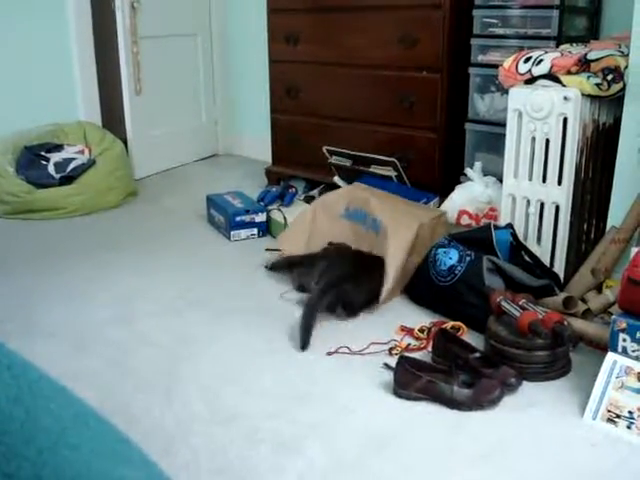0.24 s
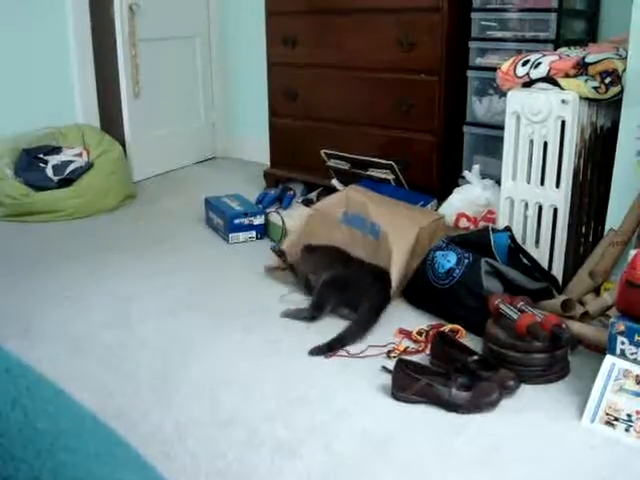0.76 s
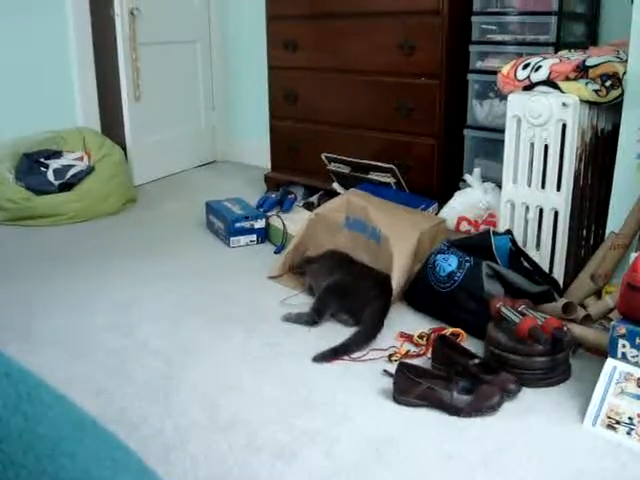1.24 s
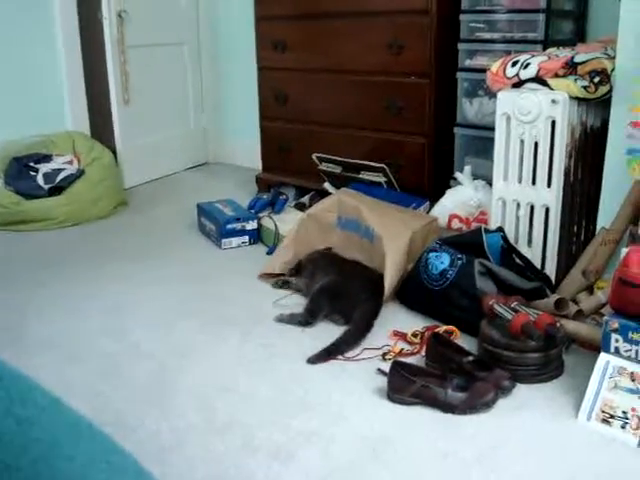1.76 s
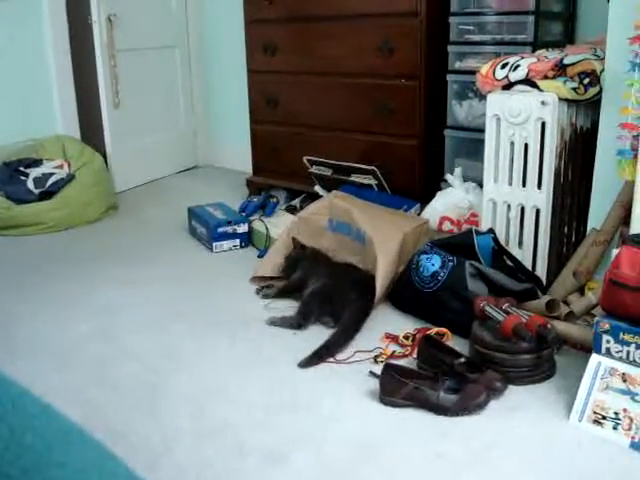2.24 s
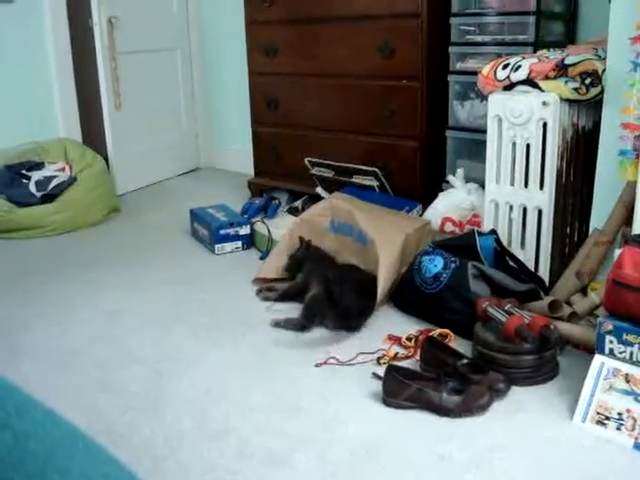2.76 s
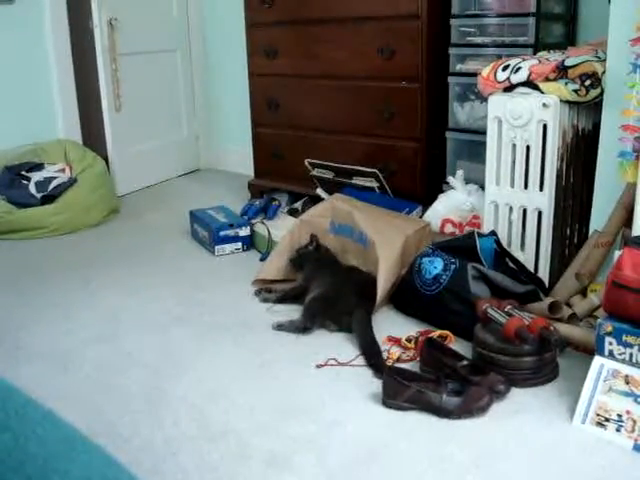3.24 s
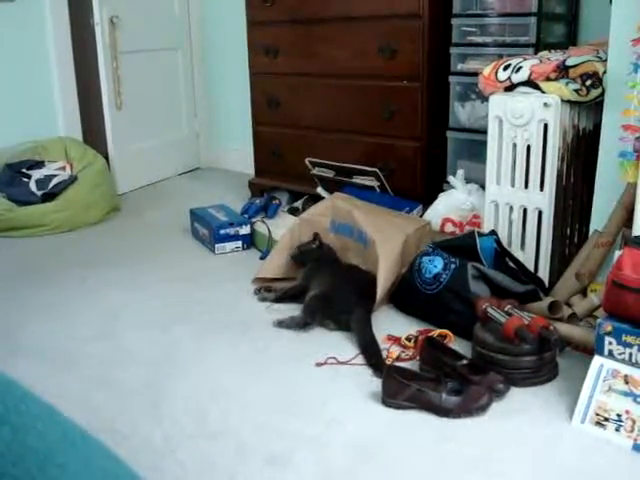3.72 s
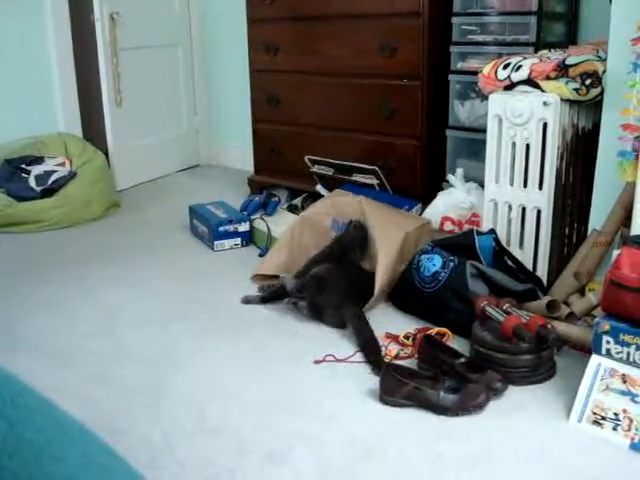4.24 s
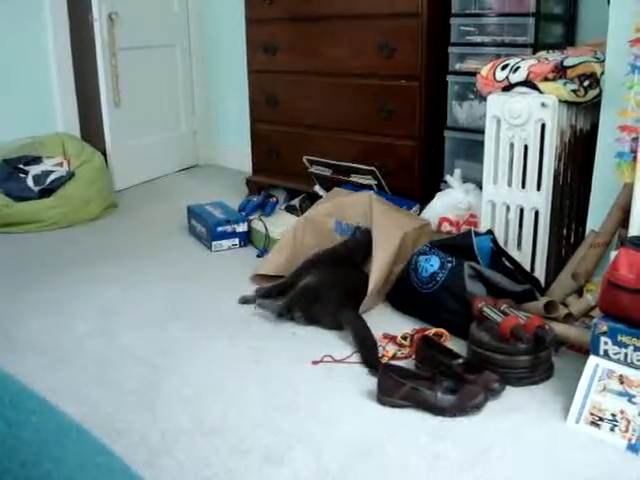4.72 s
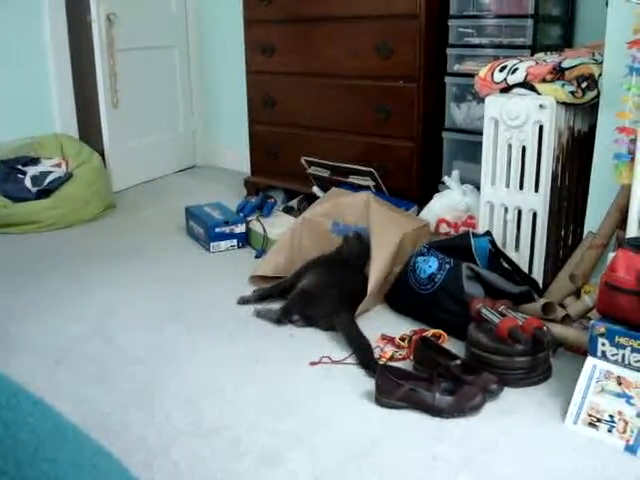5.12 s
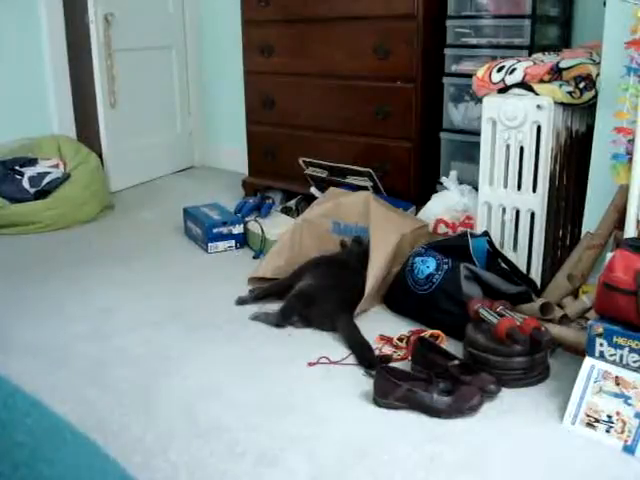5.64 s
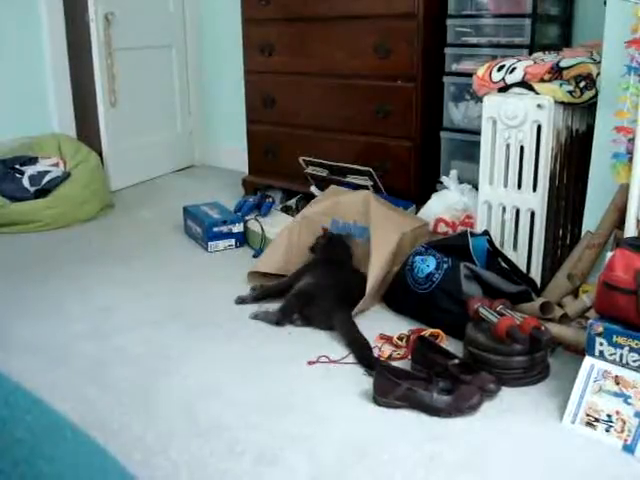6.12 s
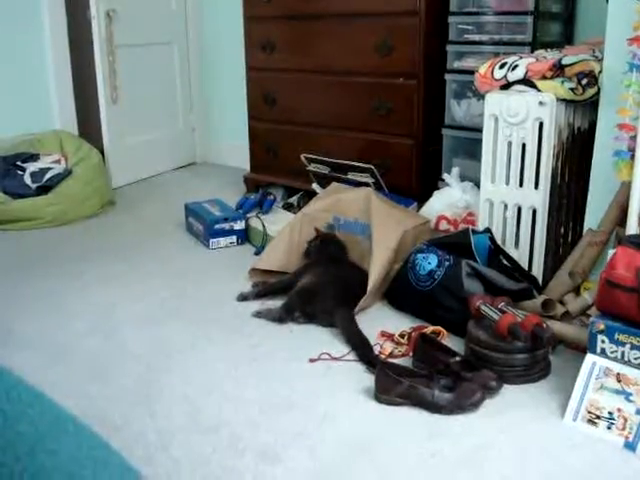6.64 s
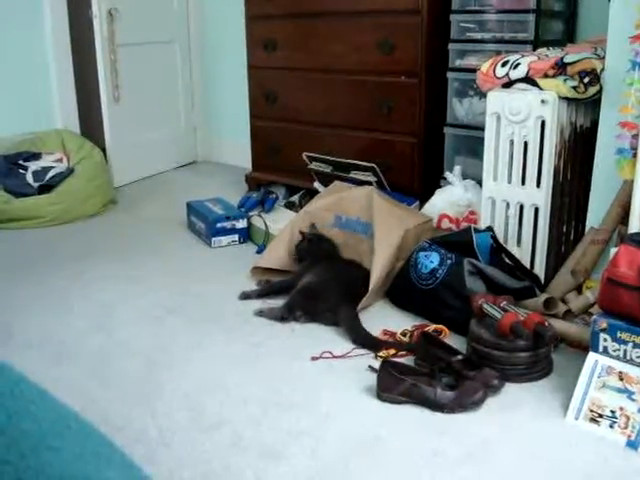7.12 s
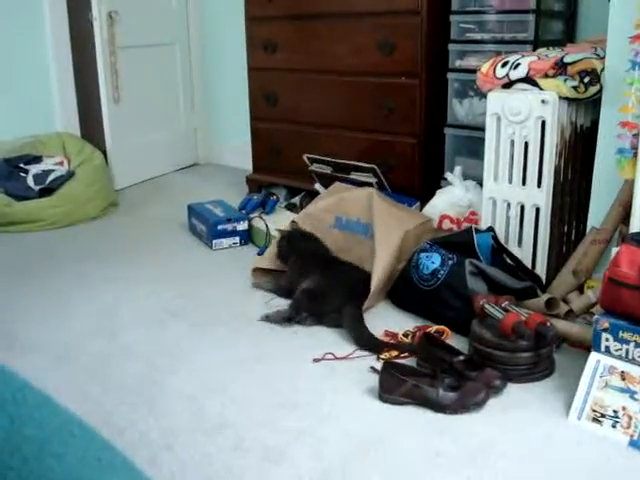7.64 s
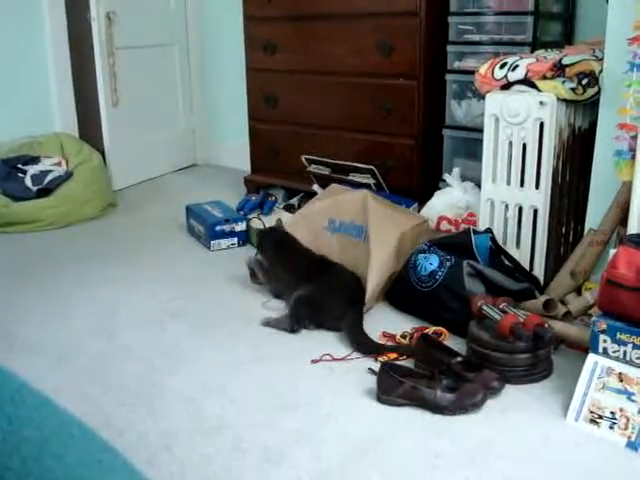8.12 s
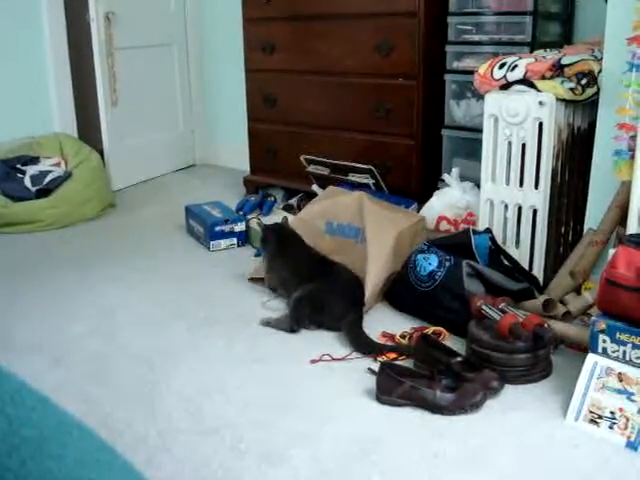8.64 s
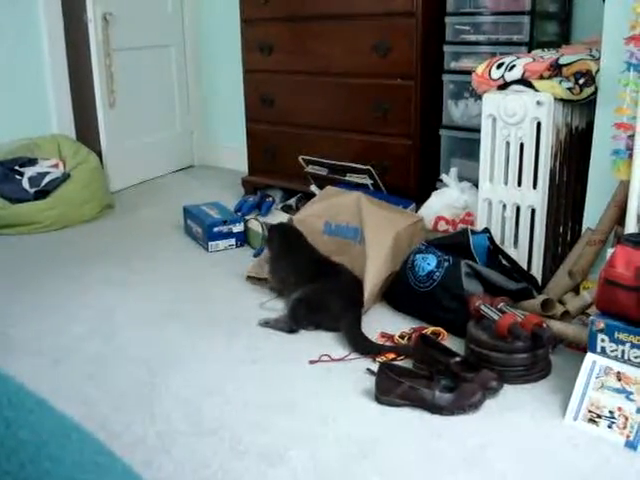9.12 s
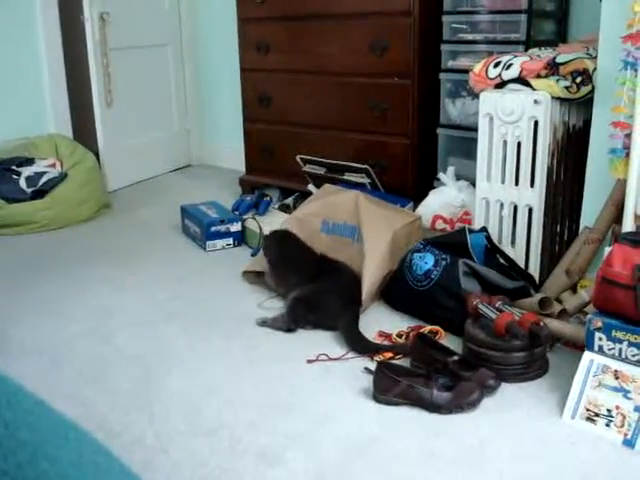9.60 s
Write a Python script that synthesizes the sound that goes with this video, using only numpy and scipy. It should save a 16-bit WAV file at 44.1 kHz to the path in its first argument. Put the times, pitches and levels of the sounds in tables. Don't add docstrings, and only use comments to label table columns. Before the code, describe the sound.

A cat shoves into a stiff paper bag on carpet, some metres from a small camera. Dense crinkling with hard pops fills the first two seconds, then nearly fades out. One very loud sharp snap breaks the quiet past four seconds, followed by small rustles, another lull, and a last uneven series of crackles and flicks. Short bedroom reflections, steady hiss, faint high whine.

```python
import sys
import numpy as np
from scipy import signal
from scipy.fft import rfft, irfft, next_fast_len
from scipy.io import wavfile
from scipy.ndimage import uniform_filter1d

SR = 44100
rng = np.random.default_rng(int(sys.argv[2]) if len(sys.argv) > 2 else 0)


def elevation(decibels):
    levels = np.asarray(decibels, float)
    return 10 ** (levels / 20)


def waveform_to_disk(signal):
    frames = np.transpose(np.atleast_2d(signal))
    scaled = np.clip(frames, -1, 1) * 32767
    samples = np.round(scaled).astype(np.int16)
    wavfile.write(sys.argv[1], SR, samples)


N = 435266

# frequency_hz, density_db
HISS_SPECTRUM = [(15, -34), (25, -12), (90, -21), (131, -5.5), (172, -5), (210, -2), (365, -2), (446, -1),
                 (602, -2.5), (876, -4), (2270, -9.5), (7750, -15.5), (9950, -18), (12900, -86),
                 (21900, -120)]
HISS_LEVEL_DB = -54.5
# frequency_hz, level_db
WHINE_LINES = [(7552.5, -79), (7582.3, -77.5), (7612, -85), (7822, -83), (7852.4, -82), (7882.3, -82.5)]
# start_s, length_s, low_hz, high_hz
TREBLE_HOLES = [
    (.835, .02, 9600, 10500),
    (1.138, .01, 5200, 7200),
    (4.461, .008, 3200, 10500),
    (4.787, .01, 4600, 8000),
    (5.293, .01, 4000, 10500),
]
# frequency_hz, t60_s
ROOM_DECAY = [(200, 0.48), (530, 0.12), (1400, 0.23), (3700, 0.25), (9000, 0.3)]
# delay_s, level_db
REFLECTIONS = [
    (.0014, -14),
    (.0099, -7),
    (.0175, -10),
    (.0228, -15),
]
# frequency_hz, width_hz, level_db
BAG_MODES = [(223, 33, -15), (326, 18, 1), (650, 30, -1.5), (1060, 200, -9), (1374, 57, -14.5),
             (1960, 94, -18), (2650, 74, -33)]

# start_s, level_db, pitch_hz
CLAW_FLICKS = [(0.377, -22, 1400), (0.5, -27.5, 1060), (0.7, -24.5, 800), (1.786, -32, 1300),
               (9.822, -44, 1830), (5.462, -41, 706), (6.192, -35, 1490), (8.126, -33, 1290),
               (8.27, -36, 1070), (8.377, -41, 1260), (8.683, -26.5, 626), (8.697, -24.5, 534),
               (8.712, -27, 2050), (8.965, -36, 1250), (9.509, -28, 690), (9.63, -30.5, 990)]
FLICK_ROOM_DB = -3.5
# start_s, level_db, pitch_hz, lower_mode_db, room_db
SINGLE_POPS = [(0.4068, -15, 3400, -3, -4), (4.472, -8.8, 3540, -11, -2.5), (0.7, -25.5, 620, -12, 6.5),
               (0.821, -19.5, 935, -6.5, 2.5), (0.92, -24, 2580, -1, -8), (1.098, -12, 1824, -1, 1),
               (1.108, -22, 1500, -8, 5), (1.692, -30.5, 1190, -16, 6), (1.786, -26, 1180, -7, 5),
               (5.356, -24.5, 1190, 0, 3), (5.451, -31, 651, -10, 7), (6.193, -37, 820, -12, 6),
               (6.204, -36, 1600, -3, 5), (7.668, -46, 970, -14, 7), (8.124, -30, 1200, -12, 7.5),
               (8.271, -33, 1020, -13, 2.5), (8.377, -25, 1200, -8, 7), (8.692, -24, 2150, -12, 5),
               (8.965, -33, 1090, -3.5, 5), (9.498, -30, 520, -2, 0), (9.629, -22, 1115, -5.5, 0)]
# start_s, level_db, pitch_hz, room_db
DULL_SNAPS = [(0.249, -39.5, 644, 15.5), (0.499, -24.5, 1000, -1), (0.599, -28.5, 603, 3),
              (0.7, -33, 636, 6), (1.026, -22.5, 1310, 4), (1.809, -32, 686, 5), (4.352, -31, 1050, 6.5),
              (4.411, -31.5, 766, 12), (4.434, -24, 556, 8.5), (4.476, -15, 3300, -8),
              (4.609, -54, 302, 15.5), (4.839, -28.5, 346, 1.5), (4.969, -30, 595, 1),
              (4.985, -34, 714, -3), (6.099, -37, 1100, 4), (6.192, -37, 2400, 2),
              (7.757, -39.5, 1020, 5.5), (7.978, -37.5, 890, 13), (8.14, -25.5, 540, 1.5),
              (8.683, -20, 1380, 11), (8.686, -23.5, 584, 7.5), (9.392, -42, 1560, 7), (9.509, -39, 700, 2),
              (9.821, -40, 1830, 13)]
# start_s, level_db, pitch_hz, room_db
CRISP_RUNS = [
    (0.103, -27, 490, 9.5),
    (0.82, -18, 910, 13.5),
    (2.329, -37, 510, -6),
    (7.839, -30, 646, 3),
    (8.051, -29.5, 1350, 7.5),
    (8.412, -17, 704, -2.5),
    (8.618, -43, 412, 9),
    (9.016, -38, 595, 9),
    (9.05, -35, 700, 8),
    (9.139, -29.5, 700, 5),
]
POP_HIGHER_DB, DULL_HIGHER_DB, CRISP_HIGHER_DB = -20, -28, -1.5

# frequency_hz, density_db
PAPER_SPECTRUM = [(41, -55), (70, -16), (160, -12), (197, -7.5), (270, -3), (312, -4.5), (462, -1.5),
                  (618, 1), (809, -3.5), (3110, -6.5), (9950, -20), (12900, -64), (21900, -120)]
PANEL_PITCHES = [536, 800, 1144, 1370, 2050]
# peak_s, level_db, rise_s, fall_s
WALL_SHOVES = [(0.115, -42, 0.024, 0.23), (0.2, -48, .05, .08), (0.35, -44.5, 0.13, 0.17),
               (0.43, -42, 0.049, 0.036), (0.505, -36.5, 0.023, 0.071), (0.61, -45, .04, 0.034),
               (0.68, -35.5, 0.055, 0.17), (0.9, -50, .2, 0.28), (1.04, -46.5, 0.13, .2),
               (1.78, -50.5, 0.28, 0.14), (2.25, -59.5, 0.28, 0.48), (4.37, -41, .05, 0.13),
               (4.46, -47, .1, .07), (4.67, -55, 0.16, .08), (4.84, -42.5, 0.071, 0.13),
               (4.992, -45.5, .06, 0.056), (5.352, -50, 0.056, .3), (5.53, -49.5, .2, 0.036),
               (5.692, -57.5, 0.14, .03), (6.21, -54, .04, .09), (7.98, -51, 0.32, .1),
               (8.1, -49, 0.2, 0.25), (8.3, -47.5, .1, .12), (8.41, -43, 0.079, .12), (8.7, -55, 0.026, .1),
               (9.02, -52.5, 0.036, 0.28), (9.5, -42, 0.0067, 0.1), (9.63, -45.5, .008, 0.058),
               (9.79, -57.5, .05, 0.22)]
# peak_s, level_db, rise_s, fall_s
BODY_PUSHES = [(0.0, -38.5, .05, 0.43), (0.14, -33.5, .05, 0.081), (0.23, -39, .2, 1),
               (0.412, -36, .012, 0.14), (0.61, -47, 0.15, .1), (0.704, -35, 0.022, 0.12),
               (0.8, -36, 0.34, 0.36), (1.13, -33.5, 0.13, 0.084), (1.53, -50.5, 0.055, .5),
               (1.7, -46.5, 0.21, 0.34), (1.8, -58.5, 0.22, 0.097), (2.3, -58, .3, 0.27),
               (4.376, -49, 0.2, .2), (4.474, -44.5, 0.072, .085), (4.65, -73, .3, .5),
               (4.84, -45.5, .1, 0.36), (4.96, -48, .2, 0.1), (5.352, -49, 0.077, 0.33),
               (5.46, -52, .012, 0.32), (6.15, -50.5, 0.27, .05), (6.208, -46, 0.051, 0.12),
               (7.79, -45, .11, 0.57), (8.0, -44, 0.17, 0.4), (8.275, -51, 0.017, 0.34),
               (8.42, -38, 0.076, 0.11), (8.7, -33.5, 0.059, 0.12), (8.97, -47, .012, 0.18),
               (9.15, -47.5, 0.51, 0.07), (9.45, -51, 0.12, .03), (9.635, -40.5, 0.019, 0.11)]
# peak_s, level_db, rise_s, fall_s
FUR_RUBS = [(0.0, -39.5, .05, 0.41), (0.15, -38.5, 0.16, 0.15), (0.27, -39.5, .15, 0.58),
            (0.41, -37, 0.031, 0.2), (0.59, -44, 0.22, 0.07), (0.67, -36.5, .08, 0.63),
            (0.84, -32, 0.24, 0.025), (0.99, -36.5, 0.35, 0.079), (1.1, -36.5, 0.051, 0.061),
            (1.62, -40, 0.15, 0.18), (1.82, -45, 0.36, 0.12), (2.2, -59, 0.78, 0.62),
            (4.35, -44.5, .12, 0.37), (4.474, -26.5, 0.0076, 0.043), (4.815, -39.5, .04, 0.15),
            (4.875, -37.5, 0.076, 0.091), (5.06, -51.5, 0.44, 0.054), (5.27, -53, .1, 0.24),
            (5.33, -34.5, 0.041, 0.13), (5.482, -52.5, 0.16, 0.33), (6.126, -45.5, 0.11, 0.15),
            (7.76, -44.5, 0.025, 0.64), (7.95, -46.5, 0.2, 0.13), (8.04, -36, 0.032, 0.066),
            (8.12, -43, 0.051, 0.046), (8.39, -41, 0.15, .25), (8.63, -46, .05, 0.82),
            (9.05, -42, 0.047, 0.24), (9.4, -51.5, .045, 0.09), (9.63, -50, 0.26, .3), ]
SWELL_DB = 20


def evened(x):
    return x / np.sqrt(np.mean(x ** 2) + 1e-20)


def read(points, hz):
    f, value = np.transpose(points)
    return np.interp(np.log(hz + 1), np.log(f + 1), value)


def add(mix, s, sound):
    part = mix[round(s * SR):][:len(sound)]
    part += sound[:len(part)]


def coloured(x, spectrum):
    size = next_fast_len(len(x))
    gain = elevation(read(spectrum, np.fft.rfftfreq(size, 1 / SR)))
    return irfft(rfft(x, size) * gain, size)[:len(x)]


def ring(x, hz, width):
    return signal.lfilter(*signal.iirpeak(hz, hz / width, SR), x)


def band(x, lo_hz, hi_hz):
    return signal.sosfilt(signal.butter(2, [lo_hz, hi_hz], "bandpass", fs=SR, output="sos"), x)


def camera_noise():
    z = rng.standard_normal((N // 256 + 5, 513, 3)).T
    patches = evened(uniform_filter1d(uniform_filter1d(z[2], 12, 0), 10, 1))
    colour = read(HISS_SPECTRUM, np.fft.rfftfreq(1024, 1 / SR))[:, None]
    bins = (z[0] + 1j * z[1]) * elevation(colour + 1.07 * patches)
    hiss = signal.istft(bins, nperseg=1024, noverlap=768)[1][:N]
    t = np.arange(N) / SR
    whine = np.zeros(N)
    for hz, db in WHINE_LINES:
        whine += elevation(db) * np.sqrt(2) * np.sin(2 * np.pi * (hz * t + rng.random()))
    return elevation(HISS_LEVEL_DB) * evened(hiss) + whine


def treble_holes(x):
    hz, t, z = signal.stft(x, SR, nperseg=256, noverlap=192)
    empty = rng.random((len(hz) // 3 + 1, len(t) // 6 + 1)) < .04
    empty = np.kron(empty, np.ones((3, 6)))[:len(hz), :len(t)]
    empty = empty * (hz[:, None] > 4600)
    for s, length, lo_hz, hi_hz in TREBLE_HOLES:
        empty[np.ix_((hz > lo_hz) & (hz < hi_hz), (t > s) & (t < s + length))] = 1
    return signal.istft(z * (1 - empty), SR, nperseg=256, noverlap=192)[1][:N]


def room_tail():
    taps = np.zeros(SR // 2)
    at = np.arange(60, len(taps) - 20, 16)
    taps[at + rng.integers(0, 16, len(at))] = rng.choice([-1., 1.], len(at))
    hz, t, z = signal.stft(taps, SR, nperseg=256)
    decay = elevation(-60 * t / read(ROOM_DECAY, hz)[:, None])
    out = signal.istft(z * decay, SR, nperseg=256)[1]
    out *= 1 - np.exp(-np.arange(len(out)) / (0.0026 * SR))
    return elevation(3.5) * out / np.linalg.norm(out)


def bedroom(x):
    turn = 2 * np.pi * 4.5 * np.arange(N) / SR
    out = np.zeros(N)
    for k in range(3):
        share = np.sqrt(2 / 3) * abs(np.cos(turn + k * np.pi / 3))
        out += signal.oaconvolve(x * share, room_tail())[:N]
    return out


def early_reflections(x):
    out = x.copy()
    for s, db in REFLECTIONS:
        add(out, s, elevation(db) * x)
    return out


def hollow_bag(x):
    return x + sum(elevation(db) * ring(x, hz, width) for hz, width, db in BAG_MODES)


def flick(db, hz):
    kick = signal.unit_impulse(2000)
    width = 0.16 * hz
    sound = ring(kick, hz, width) + .7 * ring(kick, 1.18 * hz, width)
    return elevation(db) * sound / abs(sound).max()


def panel(kicks, db, hz, higher_db, lower_db):
    main = ring(ring(kicks, hz, 0.69 * hz), hz, 1.13 * hz)
    top = min(1.07 * hz, 5000), min(3.58 * hz, 7500)
    higher = band(band(kicks, *top), *top)
    lower = band(kicks, 0.34 * hz, 0.74 * hz)
    sound = evened(main) + elevation(higher_db) * evened(higher) + elevation(lower_db) * evened(lower)
    return elevation(db) * sound / abs(sound).max()


def single_pop(db, hz, lower_db):
    return panel(signal.unit_impulse(2000), db, hz, POP_HIGHER_DB, lower_db)


def snap(db, hz, higher_db):
    kicks = np.zeros(6000)
    delay, size = rng.random((2, 30))
    at = (delay ** 1.8 * .022 * SR).astype(int)
    np.add.at(kicks, at, 1.06 * (size - .5) * (1.2 - delay))
    kicks[0] += 1
    return panel(kicks, db, hz, higher_db, lower_db=-16.0)


def creases_giving_way():
    events = [(s, single_pop(db, hz, lower_db), room_db) for s, db, hz, lower_db, room_db in SINGLE_POPS]
    for table, higher_db in (DULL_SNAPS, DULL_HIGHER_DB), (CRISP_RUNS, CRISP_HIGHER_DB):
        events += [(s, snap(db - 5.0, hz, higher_db), room_db) for s, db, hz, room_db in table]
    events += [(s, flick(db, hz), FLICK_ROOM_DB) for s, db, hz in CLAW_FLICKS]
    return events


def effort(gestures):
    s, db, rise, fall = np.transpose(gestures)[:, :, None]
    t = np.arange(0, N + 64, 64) / SR
    away = np.where(t < s, (s - t) / np.maximum(rise, .005), (t - s) / np.maximum(fall, .005))
    power = (elevation(db - SWELL_DB * away) ** 2).sum(0)
    return np.interp(np.arange(N) / SR, t, power)


def pops(per_s, spread_db, clump_db):
    size = elevation(spread_db * np.minimum(rng.exponential(1, N), 5)) * rng.choice([-1., 1.], N)
    clumps = evened(uniform_filter1d(uniform_filter1d(rng.standard_normal(N), 700), 700))
    return size * (rng.random(N) < per_s / SR) * elevation(clump_db * clumps)


def crinkle():
    shove, push, rub = effort(WALL_SHOVES), effort(BODY_PUSHES), effort(FUR_RUBS)
    walls = band(pops(per_s=530, spread_db=3.0, clump_db=3.0), 89, 497)
    panels = np.zeros(N)
    for hz in PANEL_PITCHES:
        panels += ring(pops(per_s=700, spread_db=2.5, clump_db=3.0), hz, 0.59 * hz)
    panels = band(panels, 460, 2680)
    creases = band(pops(per_s=6200, spread_db=3.0, clump_db=1.26), 2490, 10000)
    layers = [(walls, 0.0, shove + elevation(2 * -12) * push),
              (panels, -1.0, push + elevation(2 * -5) * rub),
              (creases, -2.5, rub + elevation(2 * -33.5) * push)]
    return sum(evened(coloured(voice, PAPER_SPECTRUM)) * elevation(db) * np.sqrt(power)
               for voice, db, power in layers)


def scene():
    rustle = crinkle()
    direct = np.zeros(N)
    to_room = elevation(-8.5) * rustle
    for s, sound, room_db in creases_giving_way():
        add(direct, s + 0.00074, sound)
        add(to_room, s + .0008, elevation(room_db) * sound)
    paper = elevation(0.86) * rustle + early_reflections(direct) + bedroom(to_room)
    heard = band(hollow_bag(paper), 110, 14000)
    return (elevation(-2.5) * heard + camera_noise())[None]


def band_limit(x):
    return signal.sosfilt(signal.butter(12, 10100, fs=SR, output="sos"), x)


def record(dry):
    lowpass = signal.firwin(1023, 10110, window=("kaiser", 9), fs=SR)
    limited = signal.oaconvolve(treble_holes(dry[0]), lowpass, "same")
    return band_limit(limited[None])


dry = scene()
out = record(dry)
waveform_to_disk(out)
```